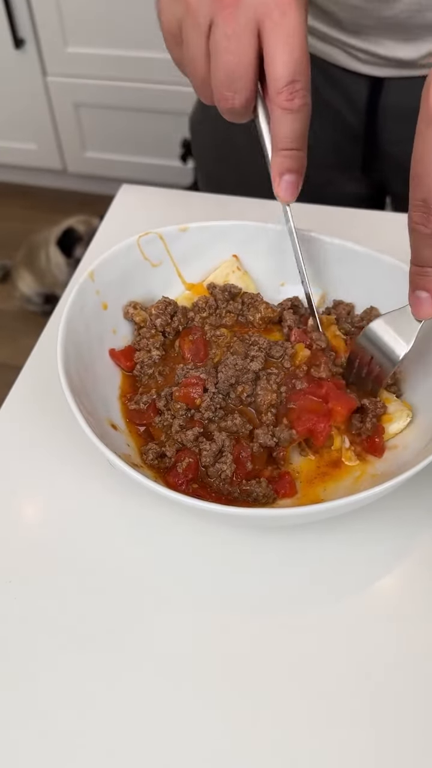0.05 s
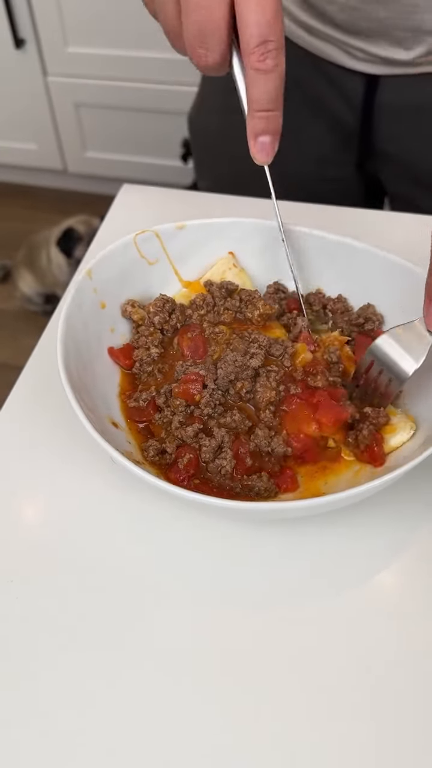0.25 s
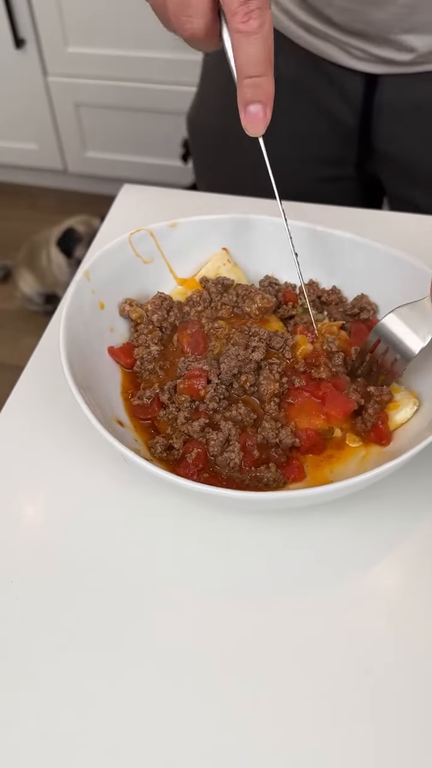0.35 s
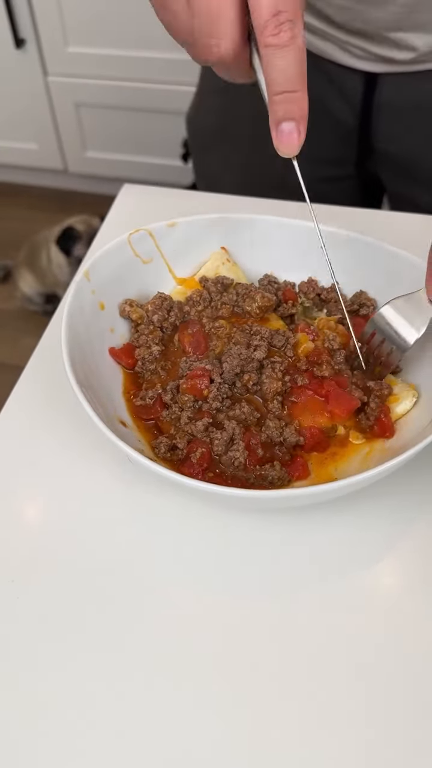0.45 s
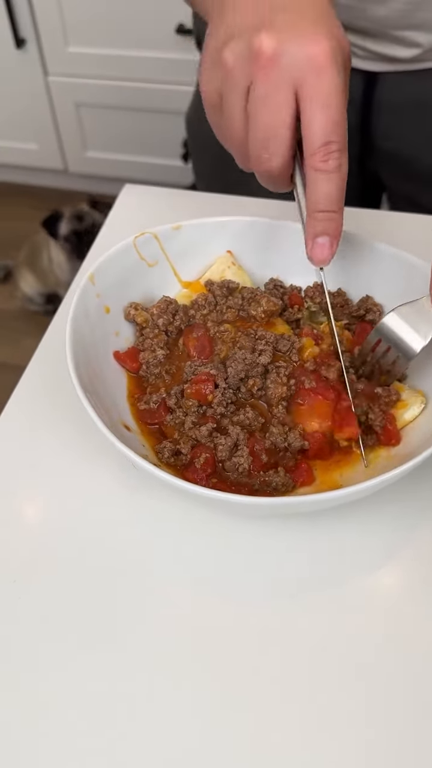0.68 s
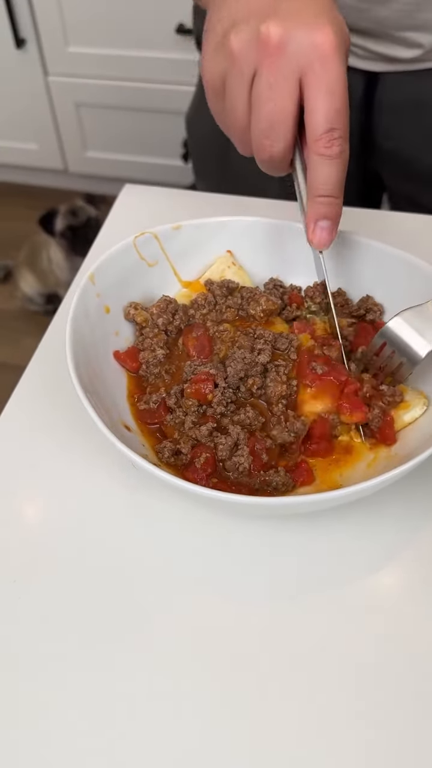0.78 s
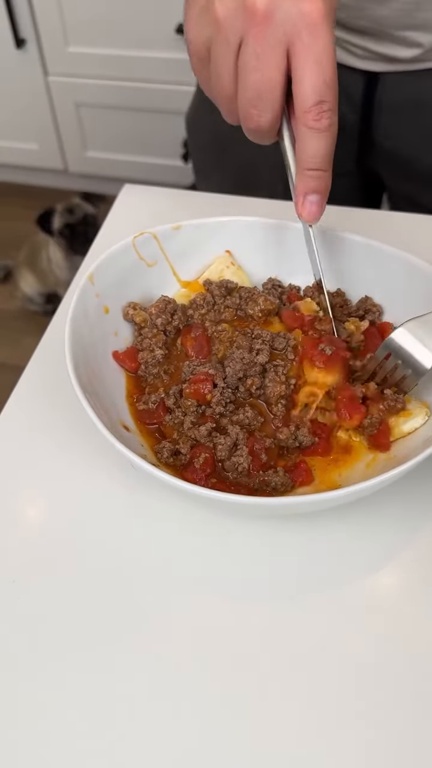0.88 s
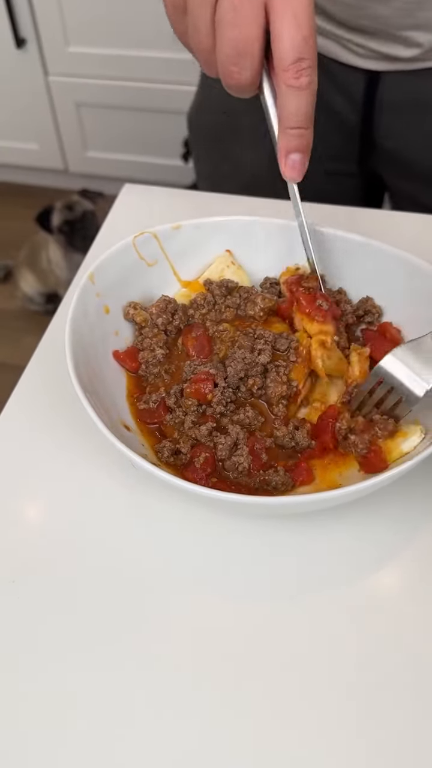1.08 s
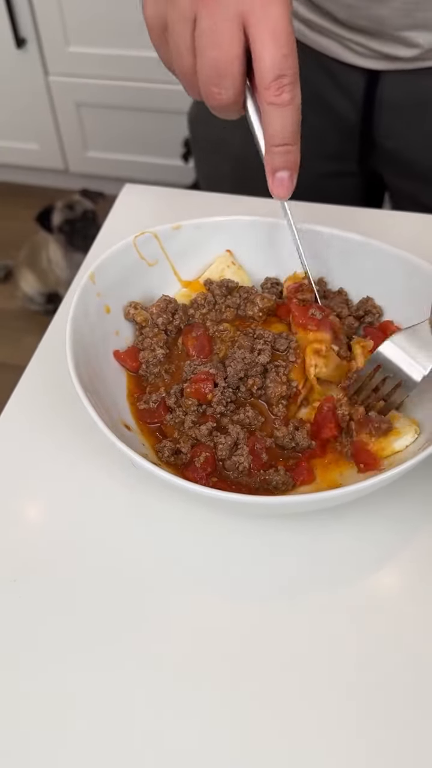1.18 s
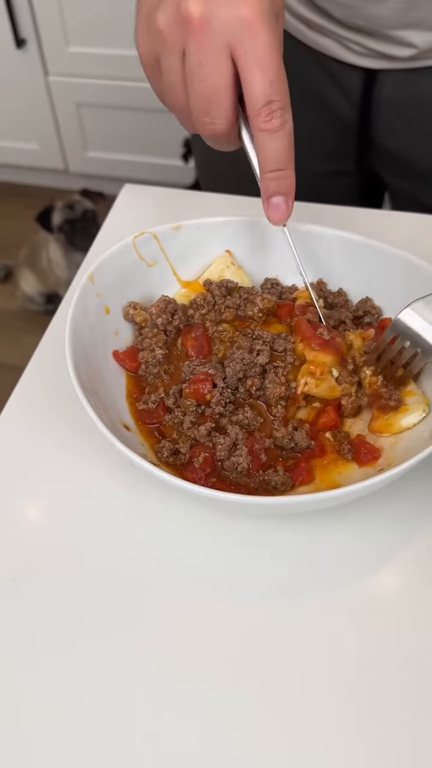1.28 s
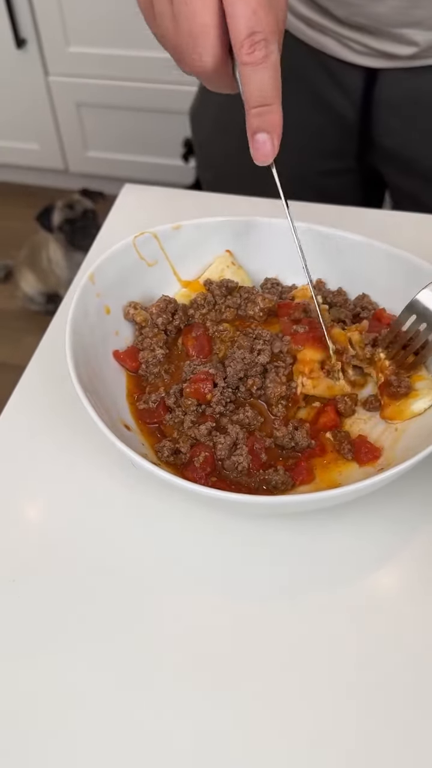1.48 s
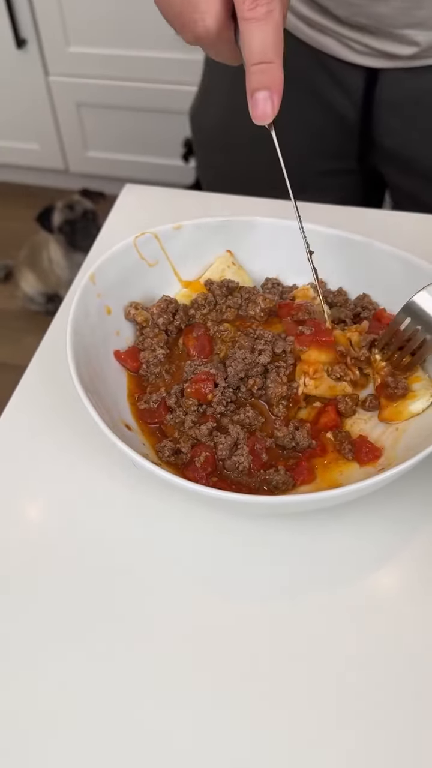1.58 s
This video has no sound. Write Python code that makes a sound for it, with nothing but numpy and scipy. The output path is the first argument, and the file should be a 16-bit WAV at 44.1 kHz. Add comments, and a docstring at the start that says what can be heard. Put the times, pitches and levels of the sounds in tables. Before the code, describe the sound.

Close clinks of metal cutlery on a ceramic bowl come in a fast run, then as scattered knocks and small ticks. Between them the knife drags through wet food, over a faint fridge hum in a slightly echoing kitchen.

```python
"""Sharp clinks of a knife and fork on a ceramic bowl, close by, as they cut wet food.
Each blow rings the bowl and knocks its foot on the counter; pressing steel damps and stiffens the ring.
Between blows the cutlery drags, ticks and squelches in the food, and the blade sings on the glaze.
The kitchen reverberates; a fridge hums under faint room air."""
import sys
import numpy as np
from scipy import signal
from scipy.fft import rfft, irfft, next_fast_len
from scipy.io import wavfile
from scipy.ndimage import map_coordinates

SR = 44100
rng = np.random.default_rng(int(sys.argv[2]) if len(sys.argv) > 2 else 0)


def generate_wav(signal):
    """Clip the signal to [-1, 1] and save it as 16-bit WAV at the path in sys.argv[1]."""
    frames = np.transpose(np.atleast_2d(signal))
    scaled = np.clip(frames, -1, 1) * 32767
    pcm = np.round(scaled).astype(np.int16)
    wavfile.write(sys.argv[1], SR, pcm)


N = 72765
TIME_S = np.arange(N) / SR


def amp(db):
    """dB to gain."""
    return 10 ** (np.asarray(db) / 20)


def along(points, hz):
    """Interpolate (hz, value) points on a log axis."""
    knots_hz, values = np.transpose(points)
    return np.interp(np.log(hz + 1), np.log(knots_hz + 1), values)


def tone(points, hz):
    """Gain from (hz, db) points, zero below half the first frequency."""
    return amp(along(points, hz)) * (hz > points[0][0] / 2)


def peak(hz, centre_hz, half_width_hz):
    """Resonance curve, 1 at the centre."""
    return 1 / (1 + ((hz - centre_hz) / half_width_hz) ** 2)


def envelopes(rows):
    """Per-sample gains from (time_s, db, ...) rows."""
    times, *columns = np.transpose(rows)
    return [amp(np.interp(TIME_S, times, db)) for db in columns]


def wobble(rate_hz):
    """Smooth random curve."""
    knots = rng.standard_normal(int(N * rate_hz / SR) + 4)
    return map_coordinates(knots, [TIME_S * rate_hz])


def filtered(x, response):
    """Apply a complex frequency response."""
    size = next_fast_len(N + SR // 2)
    return irfft(rfft(x, size) * response(np.fft.rfftfreq(size, 1 / SR)), size)[..., :N]


def stereo(noises, likeness, gain):
    """Mix two noises to left and right with a likeness per frequency."""
    angle = lambda hz: np.arccos(along(likeness, hz)) / 2
    mid, side = filtered(noises, lambda hz: gain(hz) * [np.cos(angle(hz)), np.sin(angle(hz))])
    return np.array([mid + side, mid - side])


def ring(modes, t, loss=lambda hz: 0):
    """Damped sines from (hz, db, t60_s) rows; a loss of 1 takes off another 60 dB."""
    return sum(amp(db + rng.normal(0, 1) - 60 * (t / t60 + loss(hz))) * np.sin(2 * np.pi * hz * t)
               for hz, db, t60 in modes)


def add(out, start_s, x):
    """Mix x in at start_s."""
    out[round(start_s * SR):][:len(x)] += x


# Left-right likeness of noise: freq_hz, correlation
NOISE_LIKENESS = [(60, .998), (500, .93), (3000, 0.67), (12000, 0.89)]


def grainy_noise(gain, grain_db, rate_hz):
    """Stereo noise of rms 1 with a randomly fluctuating level."""
    grains = rng.standard_normal((2, N)) * amp(grain_db * wobble(rate_hz))
    noise = stereo(grains, NOISE_LIKENESS, gain)
    return noise / np.sqrt(np.mean(noise ** 2) + 1e-20)


# Air spectrum: freq_hz, density_db
AIR_TONE = [(15, -49), (25, -4), (120, -10), (195, -14.5), (242, -14.5), (439, -26), (591, -28), (988, -39),
            (1100, -37), (2160, -53.5), (16000, -62.5)]


def room_air(level_db=-50.5, fall_db_per_s=1):
    """Low rush that sways and slowly fades."""
    air = grainy_noise(lambda hz: tone(AIR_TONE, hz), grain_db=1.5, rate_hz=10)
    return amp(level_db - fall_db_per_s * TIME_S) * air


def fridge(pitch_hz=119, level_db=-53.5, waver_db=2.5):
    """Sine hum wavering in level."""
    return amp(level_db + waver_db * wobble(rate_hz=6.7)) * np.sin(2 * np.pi * pitch_hz * TIME_S)


# Room decay: freq_hz, t60_s
KITCHEN_DECAY = [(300, 0.26), (1000, 0.85), (3000, 0.51), (8000, 0.4), (15000, 0.55)]


def kitchen(x, level_db=-13):
    """Diffuse reverberation; each frequency dies at its own rate."""
    likeness = [(200, 0.73), (1500, 0.3), (4000, 0.17), (12000, 0.37)]  # freq_hz, correlation
    noise = stereo(rng.standard_normal((2, N)), likeness, np.ones_like)[:, :SR]
    hz, t, spectra = signal.stft(noise, SR, nperseg=256)
    decay = amp(-60 * t / along(KITCHEN_DECAY, hz)[:, None])
    tail = signal.istft(spectra * decay, SR, nperseg=256)[1]
    tail /= np.linalg.norm(tail[0])
    delayed = np.pad(x, (250, 0))[None]
    return amp(level_db) * signal.fftconvolve(delayed, tail, axes=1)[:, :N]


# Sauce envelopes: time_s, fizz_db, top_db
SQUELCH_LEVELS = [(0, -62.5, -65.5), (.1, -63.5, -63), (.15, -59, -66), (.19, -58, -80), (.45, -85.5, -78),
                  (.57, -61, -84), (.76, -61, -78.5), (.83, -60, -63), (.88, -58.5, -66.5),
                  (.915, -62.5, -68.5), (.945, -58.5, -60), (.98, -56.5, -61), (1.005, -60, -72.5),
                  (1.04, -59, -61.5), (1.09, -72.5, -68), (1.125, -78, -88.5), (1.18, -68.5, -75),
                  (1.25, -60.5, -67.5), (1.31, -59.5, -74.5), (1.34, -71, -74.5), (1.41, -64.5, -73.5),
                  (1.46, -78, -71), (1.52, -79.5, -83), (1.56, -86, -85.5), (1.65, -90.5, -96)]
# Fizz spectrum: freq_hz, density_db
FIZZ_SPECTRUM = [(1760, -40), (3000, 2.5), (4170, 3), (4990, 5.5), (5150, 5), (6590, -1.5), (8040, 7.5),
                 (10500, 1), (13600, -36), (22000, -120)]


def squelch(split_hz=10500):
    """Wet fizz of the sauce, finer-grained above split_hz."""
    fizz_gain, top_gain = envelopes(SQUELCH_LEVELS)
    fizz_band = lambda hz: tone(FIZZ_SPECTRUM, hz) * (hz > 2500) * (hz < split_hz)
    fizz = grainy_noise(fizz_band, grain_db=4, rate_hz=130)
    top = grainy_noise(lambda hz: peak(hz, 13500, 3500) * (hz > split_hz), grain_db=4, rate_hz=220)
    return fizz_gain * fizz + top_gain * top


# Cutting envelopes: time_s, drag_db, scrape_db
CUT_LEVELS = [(0, -55.5, -65.5), (.06, -52.5, -63), (.16, -51.5, -63.5), (.3, -41.5, -53), (.5, -76, -81),
              (.58, -49, -69.5), (.68, -42.5, -63), (.79, -54, -77), (.86, -47.5, -59.5),
              (.915, -52.5, -75.5), (.97, -43.5, -51.5), (1.04, -45, -89), (1.11, -62.5, -97),
              (1.15, -58.5, -60.5), (1.2, -55, -67), (1.27, -60.5, -58), (1.34, -64.5, -76.5),
              (1.45, -69.5, -93), (1.65, -74.5, -92)]
# Drag spectrum: freq_hz, density_db
DRAG_SPECTRUM = [(120, -35.5), (200, -4), (396, 3.5), (712, 2.5), (783, 0), (894, -2.5), (2120, -13),
                 (2560, -25), (3500, -35), (4550, -61), (7700, -120)]


def cutting():
    """The blade drags through food and sings in a narrow band on the glaze."""
    drag_gain, scrape_gain = envelopes(CUT_LEVELS)
    drag = grainy_noise(lambda hz: tone(DRAG_SPECTRUM, hz) * (hz < 4000), grain_db=2.5, rate_hz=78)
    scrape = grainy_noise(lambda hz: peak(hz, 2510, 88), grain_db=3, rate_hz=100)
    return drag_gain * drag + scrape_gain * scrape


# Modes of the bowl's foot on the counter: pitch_hz, level_db, t60_s
COUNTER_MODES = [(128.7, -23.5, 0.21), (403.7, -8, 0.054), (487.6, -4.5, 0.052), (613, -9.5, 0.089),
                 (766.4, -9, 0.063), (854, 1, 0.03), (1010, -14, 0.036), (1473, -5, 0.033), (2294, -3, .02),
                 (2760, 5, 0.0098)]
# Soft pushes: start_s, level_db
BUMP_EVENTS = [(0.87, -22), (0.954, -19.5), (0.974, -21), (0.994, -41), (1.035, -46.5), (1.049, -23.5),
               (1.281, -30)]


def bumps(attack_s=0.006, tilt_db_per_octave=-8):
    """Soft pushes knock the counter, favouring its low modes."""
    out, t = np.zeros(N + SR), np.arange(SR // 5) / SR
    modes = [(hz, db + tilt_db_per_octave * np.log2(hz / 500), t60) for hz, db, t60 in COUNTER_MODES]
    attack = 1 - np.exp(-t / attack_s)
    for start_s, level_db in BUMP_EVENTS:
        add(out, start_s, amp(level_db - 5.5) * attack * ring(modes, t))
    return out[:N]


# Light cutlery contacts: start_s, level_db, pitch_hz, click_db
TICK_EVENTS = [(0.0864, -72, 2110, -10), (0.1644, -38, 2630, -4), (0.825, -28, 6220, -9),
               (0.8948, -39.5, 2460, -0.5), (1.2125, -44, 2432, -11), (1.2485, -43, 2524, -2.5),
               (1.2609, -36.5, 2554, -5), (1.3094, -36, 5320, -18.5), (1.3523, -47.5, 2300, -24.5),
               (1.3797, -45.5, 7480, 2), (1.4041, -35, 3960, -11.5), (1.487, -28.5, 7630, -27.5),
               (1.6117, -47, 4100, -11.5)]


def ticks(attack_s=0.0014, ring_cycles=15, click_t60_s=0.0063):
    """Each light contact gives a brief ping and a noise click."""
    out, t = np.zeros(N + SR), np.arange(SR // 5) / SR
    attack = 1 - np.exp(-t / attack_s)
    for start_s, level_db, pitch_hz, click_db in TICK_EVENTS:
        click = amp(click_db - 60 * t / click_t60_s) * rng.standard_normal(len(t))
        ping = ring([(pitch_hz, 0, ring_cycles / pitch_hz)], t)
        add(out, start_s, amp(level_db + 5) * attack * (ping + click))
    return out[:N]


# Bands the crack barely excites: centre_hz, half_width_hz
CRACK_HOLLOWS = [(1180, 96), (4500, 250), (6150, 170)]


def impact_noise(colour, t, floor_hz=332, rattle_hz=2360, bite_hz=8000):
    """Noise of one blow: a crack, a dull rattle and a brief bright scrape."""
    hz = np.fft.rfftfreq(len(t), 1 / SR)
    highpass = hz ** 4 / (hz ** 4 + floor_hz ** 4)
    hollows = np.prod([1 - .75 * peak(hz, *band) for band in CRACK_HOLLOWS], axis=0)
    spectrum = rfft(rng.standard_normal(len(t))) * amp(along(colour, hz)) * highpass * hollows
    burst = lambda band, db, t60_s: amp(db - 60 * t / t60_s) * irfft(spectrum * band, len(t))
    crack = burst(1, db=0, t60_s=0.018)
    rattle = burst(peak(hz, 0, rattle_hz), db=-16.5, t60_s=0.36)
    bite = burst(hz > bite_hz, db=-11, t60_s=.07)
    return crack + rattle + bite


# Bowl modes: pitch_hz
BOWL_MODE_HZ = [910, 1635, 1740, 2687, 3915, 5324, 6600, 6882, 8489, 10270, 11490, 12900, 14460]
# Ring of each mode: level_db, t60_s
BOWL_RING = [(-21, 0.22), (-15.5, 0.34), (-1, 0.047), (-8.5, 0.28), (-1, 0.18), (-6.5, 0.12), (-19, 0.067),
             (-10.5, 0.11), (-13, 0.22), (-15, 0.17), (-35.5, 0.19), (-32.5, 0.22), (-30.5, .15)]
# Colour bands of a blow: centre_hz
BAND_HZ = [480, 900, 1750, 2700, 3900, 5350, 6900, 10000]
# Blows: start_s, level_db, band_db for each of BAND_HZ, relative_pressure, crack_db
CLINK_EVENTS = [(0.0453, -29, -18.5, -16, -20.5, -18.5, -42, -19.5, -21, -30.5, 0.84, 4.5),
                (0.2059, 2, -23.5, -23.5, -10.5, -19, -24, -16.5, -16.5, -32.5, 1.5, -9),
                (0.2233, 1.5, -21, -16.5, -11, -17, -29.5, -7.5, -10, -26, 0.68, -13),
                (.267, 5, -27.5, -26.5, -19.5, -18, -28.5, -13.5, -16.5, -26.5, 0.79, -17),
                (0.291, 7, -44, -19.5, -27.5, -20, -34.5, -15, -23, -38.5, 0.015, -6),
                (.599, 0, -12.5, -9.5, -19.5, -19, -35.5, -27, -21, -30, 0.019, -1),
                (1.027, -31, -6, -8.5, -16.5, -11, -29, -18.5, -26, -34, 0.34, 4),
                (1.2799, -20, -13, -31.5, -26.5, -31, -21, -25, -21, -32, 1.6, 3)]
# Stiffening by the pressing steel, per blow: rise_hz
CLINK_RISE_HZ = [50, 125, 92, 85, 0, 0, 0, 0]


def clinks(attack_s=.0008, damping_per_s=5.4, grip_per_s2=500):
    """Steel rings bowl and counter; its pressure damps the bowl ever faster as it settles."""
    out, t = np.zeros(N + SR), np.arange(SR // 2) / SR
    envelope = (1 - np.exp(-t / attack_s)) * (1 - t / t[-1])
    for (start_s, level_db, *band_db, pressure, crack_db), rise_hz in zip(CLINK_EVENTS, CLINK_RISE_HZ):
        colour = list(zip(BAND_HZ, band_db))
        loss = lambda hz: pressure * (damping_per_s * (hz / 2700) ** -.8 * t + grip_per_s2 * t * t)
        modes = [(hz + rise_hz, db + along(colour, hz), t60)
                 for hz, (db, t60) in zip(BOWL_MODE_HZ, BOWL_RING)]
        bowl = ring(modes, t, loss)
        foot = ring([(hz, db + along(colour, hz), t60) for hz, db, t60 in COUNTER_MODES], t)
        noise = amp(crack_db + 15) * impact_noise(colour, t)
        add(out, start_s, amp(level_db + 2) * envelope * (bowl + foot + noise))
    return out[:N]


# Contact balance: freq_hz, left_over_right_db
CONTACT_PAN = [(480, 1), (900, 1), (1800, 0), (2700, 1.5), (3950, 6), (5370, -6), (6920, 0), (13000, -1)]
# Contact phase: freq_hz, left_lead_rad
CONTACT_PHASE = [(480, .15), (1800, 0), (2700, .4), (3950, -1.6), (5370, .5), (6920, -.5), (8500, .4),
                 (10300, .7), (13000, -.6)]


def scene():
    """Contacts reach left and right unequally; room, food noise and hum surround them."""
    contacts = clinks() + ticks() + bumps()
    side = np.array([[.5], [-.5]])
    balance = lambda hz: amp(side * along(CONTACT_PAN, hz))
    phase = lambda hz: np.exp(1j * side * along(CONTACT_PHASE, hz))
    direct = filtered(contacts, lambda hz: balance(hz) * phase(hz))
    return direct + kitchen(contacts) + cutting() + squelch() + fridge() + room_air()


# Narrow, steady treble dips: centre_hz, width_hz, depth_fraction
TONE_DIPS = [(3400, 200, .7), (4900, 450, 1), (7620, 250, 1)]


def record(dry, bass_hz=83, top_hz=15900):
    """The bass thins, the treble dips near 3.4, 4.9 and 7.6 kHz, and nothing passes above top_hz."""
    def response(hz):
        gain = (hz < top_hz) * (1j * hz / (bass_hz + 1j * hz)) ** 2
        for centre_hz, width_hz, depth in TONE_DIPS:
            gain *= 1 - depth * 1j * hz * width_hz / (centre_hz ** 2 - hz ** 2 + 1j * hz * width_hz)
        return gain
    return filtered(dry, response)


dry = scene()
out = record(dry)
generate_wav(out)
```